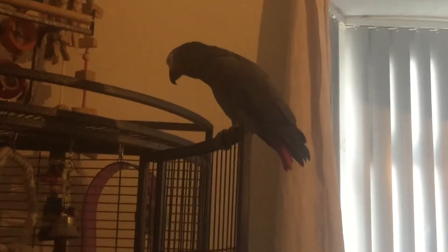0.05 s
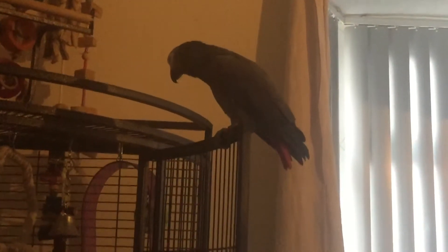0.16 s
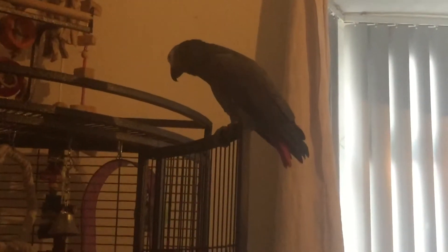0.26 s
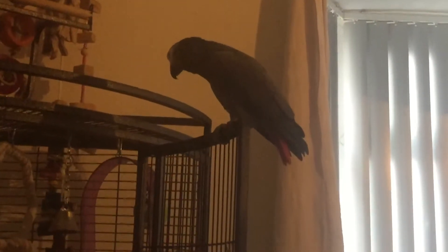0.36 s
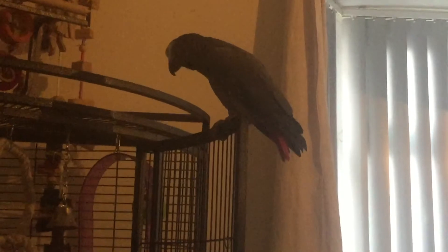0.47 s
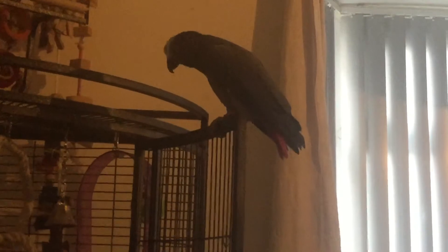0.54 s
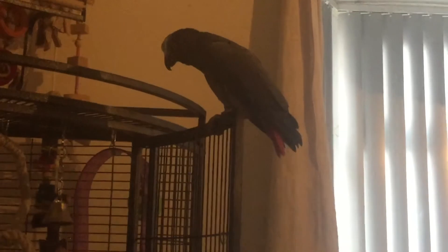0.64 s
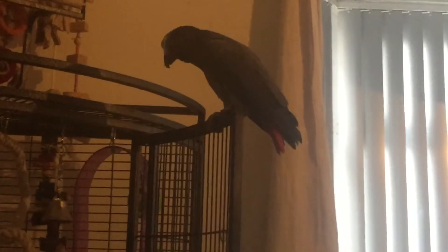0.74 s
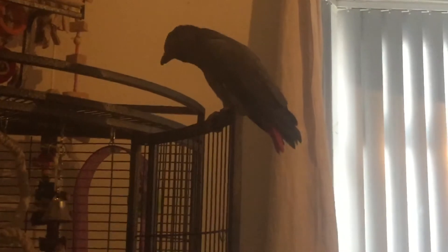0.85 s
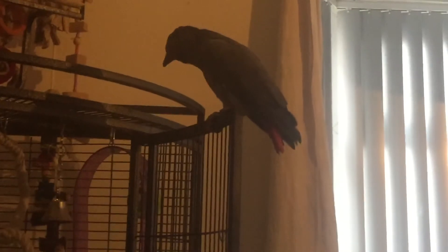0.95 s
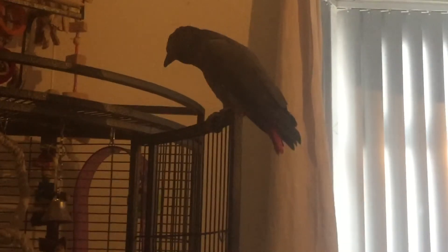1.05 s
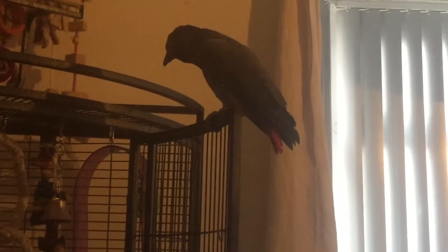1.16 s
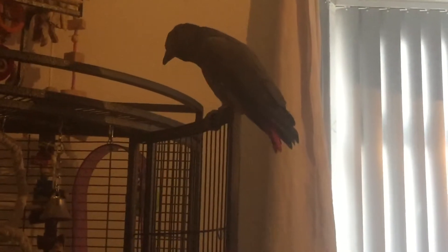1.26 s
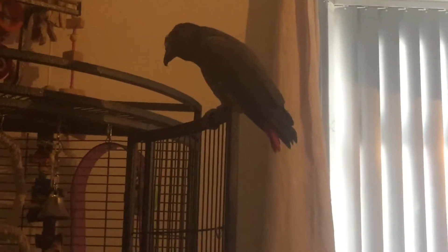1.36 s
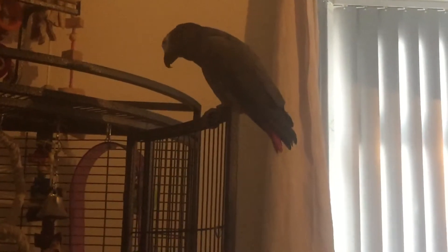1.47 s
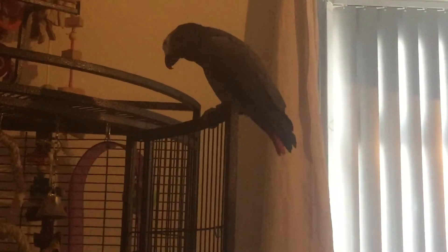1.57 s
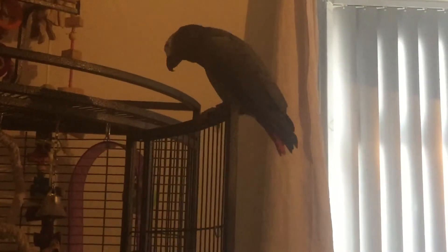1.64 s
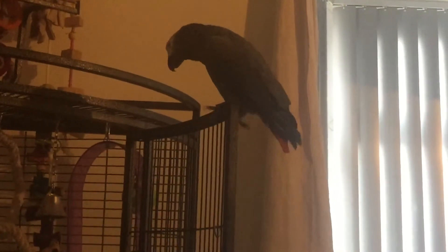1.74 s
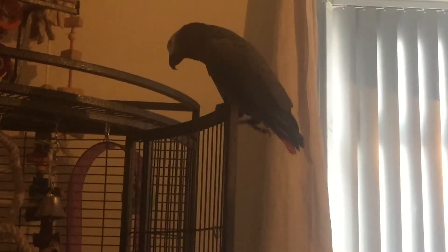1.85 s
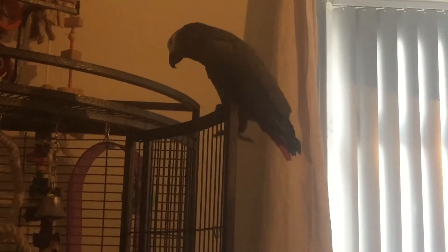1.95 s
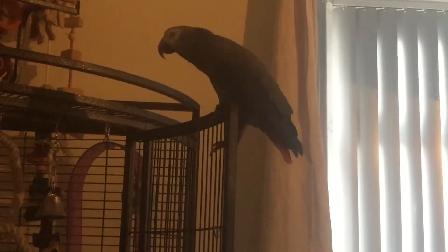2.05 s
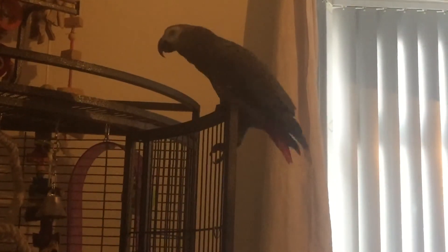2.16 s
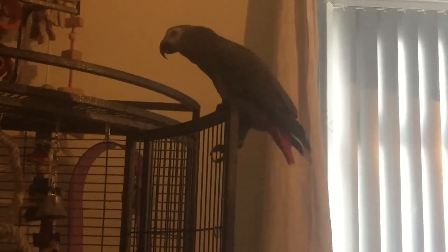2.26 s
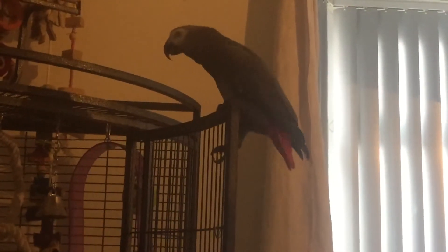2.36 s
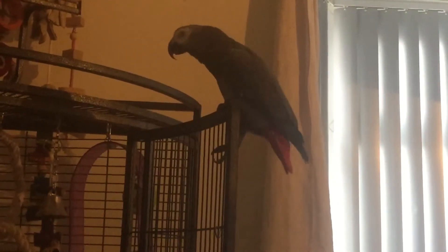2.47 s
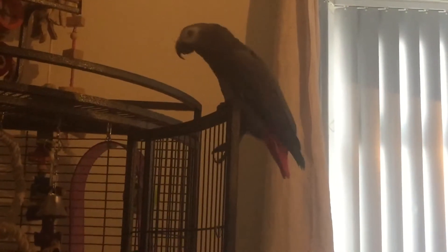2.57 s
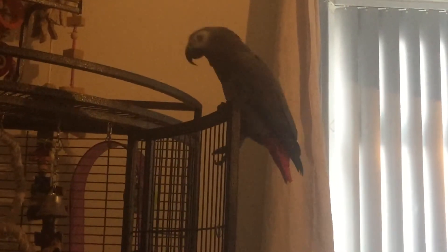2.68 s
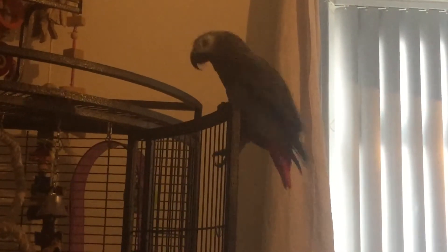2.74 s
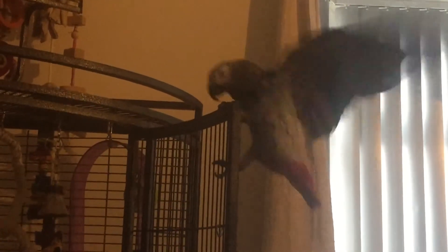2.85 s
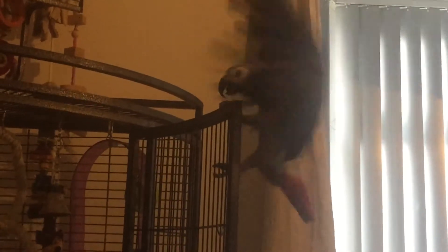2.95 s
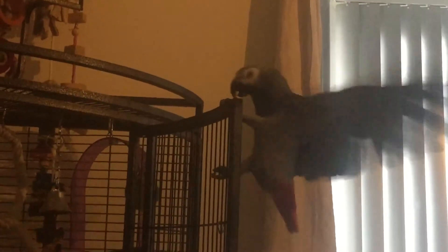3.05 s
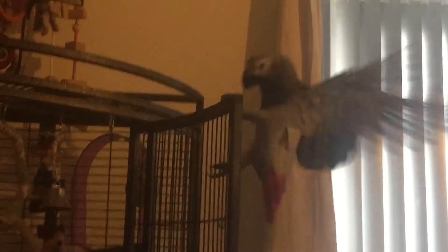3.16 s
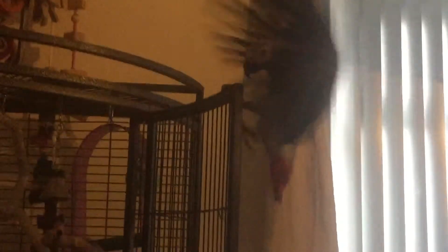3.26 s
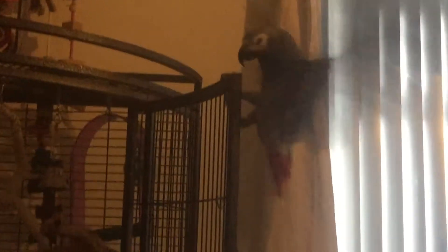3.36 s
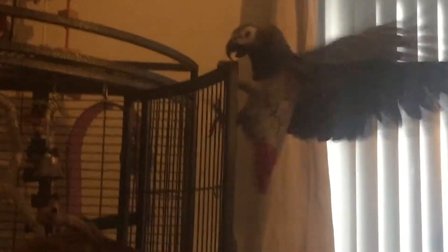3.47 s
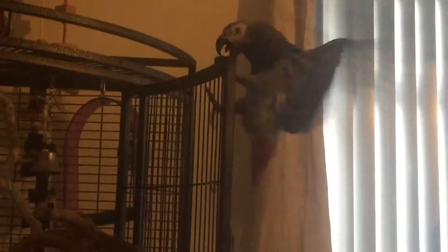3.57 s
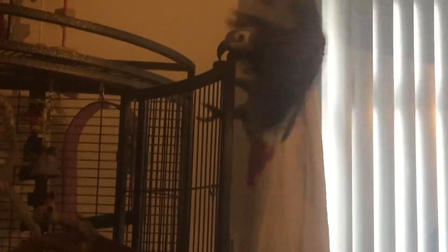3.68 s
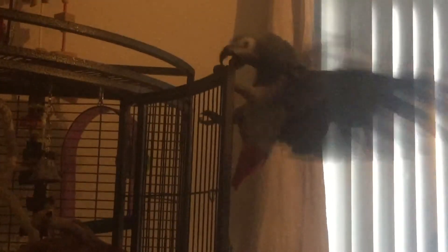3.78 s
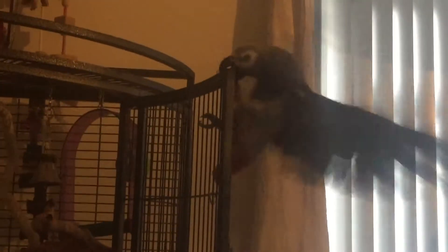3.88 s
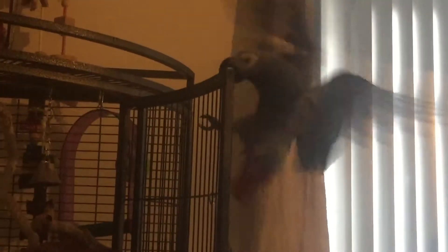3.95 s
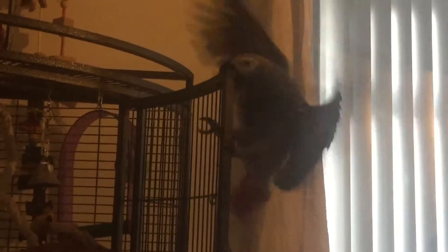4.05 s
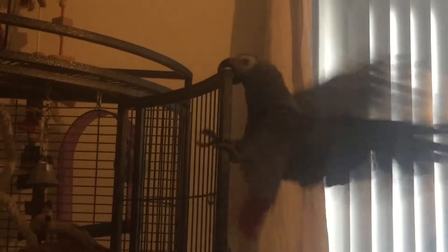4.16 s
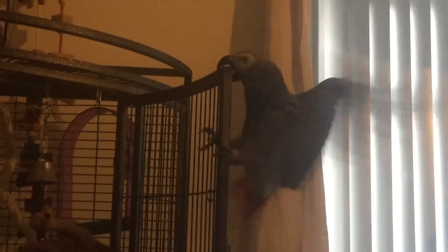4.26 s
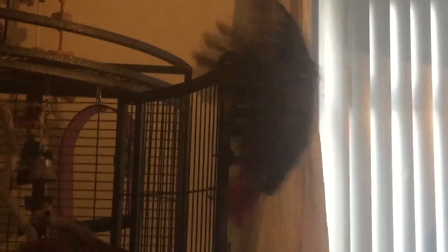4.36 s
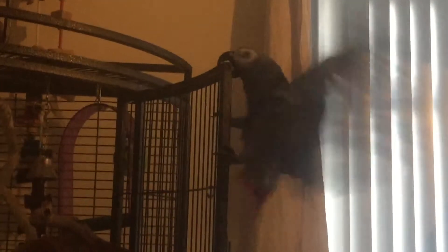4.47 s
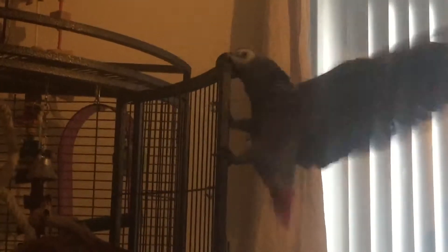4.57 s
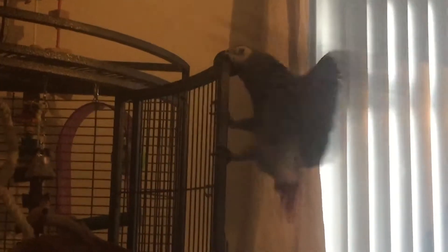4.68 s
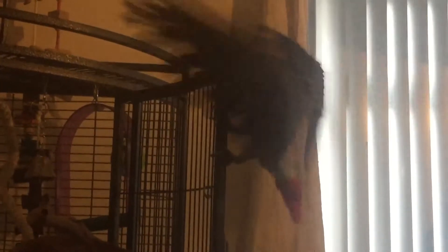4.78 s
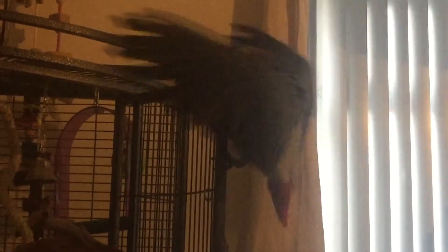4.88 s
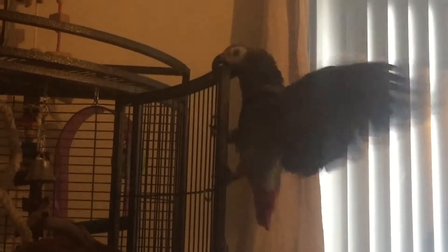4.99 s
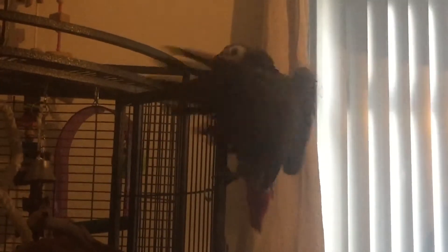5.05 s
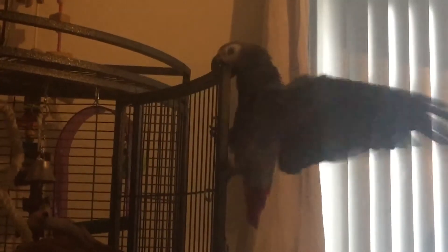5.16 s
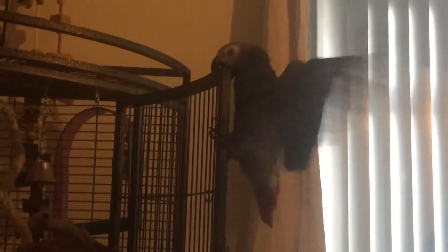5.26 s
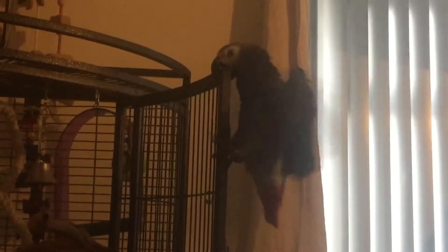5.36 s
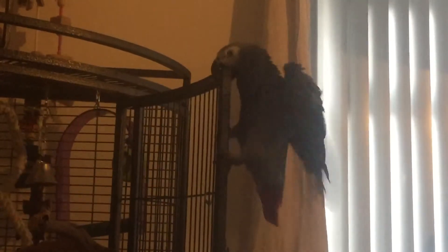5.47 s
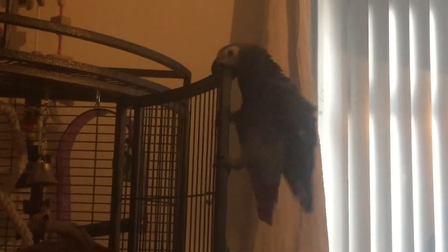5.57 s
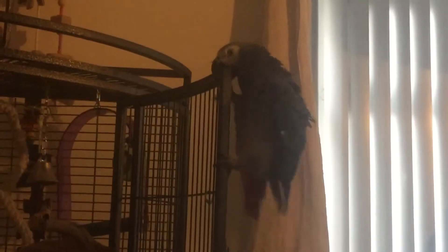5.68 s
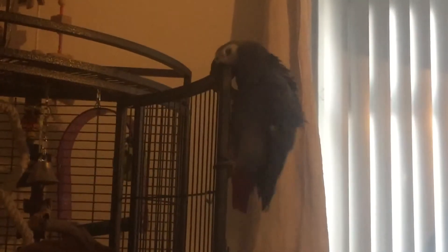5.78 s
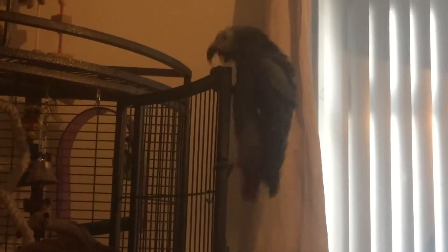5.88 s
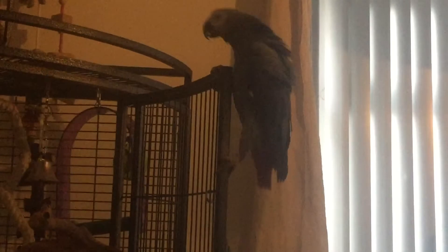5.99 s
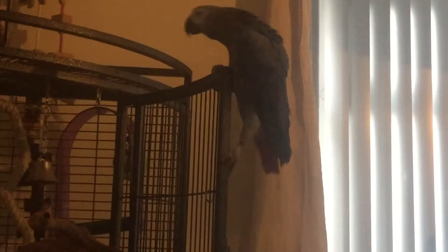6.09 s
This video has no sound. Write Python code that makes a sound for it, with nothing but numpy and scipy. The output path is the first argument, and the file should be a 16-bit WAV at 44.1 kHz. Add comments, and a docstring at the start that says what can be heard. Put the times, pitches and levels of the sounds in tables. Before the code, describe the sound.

Low electrical hum in a small room, then a parrot's wings flap in fast, feathery whooshing beats while claws scrape and ring metal cage bars.

```python
"""An appliance hums in a small room, with dull noise and faint swells of hiss, before claws scrape a metal cage.
A grey parrot clambers down the cage door, slips, and beats its wings about seven times a second to climb back.
Each beat layers shaped noise: a push of air, a gusty whoosh and a rustle of feathers, with slaps and brushes.
Claws and beak scrape the bars: bursts of grains set noisy modes ringing, and sine tones sing on after a slip.
"""
import sys
import numpy as np
from scipy import signal
from scipy.fft import rfft, irfft
from scipy.io import wavfile

SR = 44100
rng = np.random.default_rng(int(sys.argv[2]) if len(sys.argv) > 2 else 0)


def put_to_file(sound):
    """Save the sound as 16-bit audio at rate SR, in the file named by the first command-line argument."""
    columns = np.atleast_2d(sound).T  # one column per channel
    safe = np.clip(columns, -1, 1)
    whole_steps = np.round(safe * 32767)
    wavfile.write(sys.argv[1], SR, whole_steps.astype(np.int16))


N = 270059

EVENT_SIZE = 32768  # samples in one sound event
LEAD_S = 0.15  # room before an event's nominal time, for sounds that swell up to it
AGE = np.arange(EVENT_SIZE) / SR  # seconds since the event began

# Spectrum of rubbing feathers. Each row: frequency in Hz, relative level in dB per Hz.
FEATHER_COLOUR = [(500, 8), (1100, 0.5), (1900, 6), (3200, 6), (5000, 0), (8000, 1.5), (11000, 0),
                  (15500, -4.5)]


def from_db(db):
    """Decibels to gain."""
    return 10 ** (np.asarray(db) / 20)


def rms_one(x):
    """Scale to unit rms."""
    return x / np.sqrt(np.mean(x ** 2) + 1e-20)


def unit_attack(x):
    """Scale a hit to unit rms over its first thirtieth of a second."""
    return x / np.sqrt(np.mean(x[:SR // 30] ** 2) + 1e-20)


def add(out, s, sound):
    """Mix a sound in at time s, in seconds."""
    start = int(s * SR)
    out[start:start + len(sound)] += sound[:N - start]


def noise():
    """White noise as long as one event."""
    return rng.standard_normal(EVENT_SIZE)


def grains(spread_db):
    """Dense tiny snaps of very uneven size."""
    return noise() * from_db(spread_db * np.minimum(rng.exponential(1, EVENT_SIZE), 5))


def drift(rate, size):
    """Smooth chance that changes about `rate` times a second; rms 1."""
    knots = rng.standard_normal(size // 20)
    return rms_one(np.interp(np.arange(size) * rate / SR, np.arange(len(knots)), knots))


def swell(peak_s, rise_s, fall_s):
    """Exponential rise to a peak and fall from it, timed from the end of the lead."""
    t = AGE - LEAD_S - peak_s
    return np.exp(np.minimum(t, 0) / rise_s - np.maximum(t, 0) / fall_s)


def octaves(size):
    """Log2 frequency of each bin of a spectrum."""
    return np.log2(np.maximum(np.arange(size // 2 + 1) * SR / size, 1))


def coloured(x, colour, tilt_db=0):
    """Give x a spectrum, tilted in dB per octave about its middle point; rms 1."""
    hz, db = np.transpose(colour)
    pitch = octaves(len(x))
    tilt = tilt_db * np.clip(pitch - np.log2(hz[len(hz) // 2]), -2, 2)
    shape = np.interp(pitch, np.log2(hz), db) + tilt
    below = np.minimum(pitch - np.log2(hz[0]), 0)  # octaves under the lowest point: 20 dB lost in each
    return rms_one(irfft(rfft(x) * from_db(shape + 20 * below), len(x)))


def reach(hz, centre_hz, width):
    """Resonance-like weight around a centre; for a contact, its hardness decides which modes it reaches."""
    return 1 / (1 + (np.log2(hz / centre_hz) / width) ** 2)


def fluttering(x, depth_db, rate, count=7):
    """Irregular gusts: bands an octave apart waver, partly together and partly alone; the top stays steady."""
    spectrum, pitch, shared = rfft(x), octaves(len(x)), drift(rate, len(x))
    centres = np.log2(200) + np.arange(count)
    bands = [irfft(spectrum * np.interp(pitch, centres, band), len(x)) for band in np.eye(count)]
    out = bands[-1]
    for band in bands[:-1]:
        waver = (shared + drift(rate, len(x))) / np.sqrt(2)
        out = out + band * from_db(depth_db * waver)
    return out


def room_noise(uneven_db=2.2, changes_per_s=11):
    """Dull, slightly uneven noise, with faint, short swells of hiss."""
    # Spectra of the steady noise and the hiss. Each row: frequency in Hz, relative level in dB per Hz.
    noise_colour = [(22, -27), (41, 7), (55, -1.5), (130, 5.5), (220, -0.5), (290, -3.5), (370, -11),
                    (580, -5), (1100, -10.5), (1570, -15), (1680, -10.5), (1860, -13.5), (2000, -19.5),
                    (4500, -28.5), (8000, -31), (15500, -41)]
    hiss_colour = [(800, -22), (1250, 5), (1750, -4.5), (2300, -18), (6000, -37)]
    # Swells of hiss. Each row: peak time in seconds, level in dB.
    hiss_swells = [(0.291, -53), (0.799, -70), (0.929, -72), (1.071, -61), (1.361, -65)]
    level_db = -54
    steady = coloured(rng.standard_normal(N), noise_colour)
    out = from_db(level_db) * fluttering(steady, uneven_db, changes_per_s, count=5)
    for s, db in hiss_swells:
        hiss = coloured(noise(), hiss_colour) * swell(0, 0.025, 0.033)
        add(out, s - LEAD_S, from_db(db) * hiss)
    return out


def appliance(wander=0.19):
    """A strong, wavering mains hum with a few faint motor tones whose phase wanders by `wander` radians."""
    # Course of the hum before its waver. Each row: time in seconds, rms level in dB.
    hum = [(0.05, -32), (0.47, -34.5), (1.03, -32), (1.29, -34.5), (2.12, -32.5), (2.56, -35),
           (2.71, -32.5), (2.99, -34.5), (3.41, -32), (3.69, -33.5), (3.73, -35.5), (4.23, -31),
           (4.73, -33), (5.41, -32), (5.88, -34.5), (6.05, -33)]
    # Steady motor tones. Each row: frequency in Hz, rms level in dB.
    motor_tones = [(199.6, -62.5), (699, -73), (834.4, -61.5), (1206.5, -74), (1498, -70)]
    hum_hz, waver_db, wavers_per_s = 99.9, 0.49, 13
    t = np.arange(N) / SR
    level_db = np.interp(t, *np.transpose(hum)) + waver_db * drift(wavers_per_s, N)
    out = from_db(level_db) * np.sin(2 * np.pi * hum_hz * t)
    for hz, db in motor_tones:
        out = out + from_db(db) * np.sin(2 * np.pi * hz * t + wander * drift(8.7, N))
    return np.sqrt(2) * out  # sine peak from rms level


def beak():
    """The beak snaps with a short, hollow tick: resonantly coloured noise that dies at once."""
    # Clicks. Each row: start in seconds, level in dB.
    clicks = [(1.562, -51.5), (2.736, -69.5)]
    # Spectrum of the tick. Each row: frequency in Hz, relative level in dB per Hz.
    beak_colour = [(900, -22), (1650, 0.5), (2100, -19), (2550, -5), (2880, -17), (3330, 0), (3800, -23),
                   (5200, -21), (5700, -2), (6100, 10), (6550, -9), (7300, -7), (8500, -20), (15500, -33)]
    decay_s = 0.011
    out = np.zeros(N)
    for s, db in clicks:
        tick = coloured(noise(), beak_colour) * np.exp(-AGE / decay_s)
        add(out, s, from_db(db) * unit_attack(tick))
    return out


def cage_ring(slips, damping, frame_db, frame_t60_s=0.32):
    """The cage answers a run of slips: noisy bending modes of the bars over a short clatter of the frame."""
    # Bending modes. Each row: frequency in Hz, relative level in dB, t60 in seconds before the grip damps it.
    bar_modes = [(1930, 4, 0.7), (3220, -2, 0.36), (4630, -7, 0.33), (6540, -2, 0.32), (8810, -4.5, 0.56),
                 (11300, -4, 0.21), (14000, -6, 0.13)]
    bar_spread = 0.042  # the many bars differ a little: each mode is a cluster this wide, as a share of its pitch
    frame = noise()
    spectrum, force, bins_hz = rfft(frame), rfft(slips), 2 ** octaves(EVENT_SIZE)
    parts = [(frame, frame_db, frame_t60_s)]
    for hz, db, t60 in bar_modes:
        cluster = 1 / (1 + abs((bins_hz / hz - 1) / bar_spread) ** 3)
        parts.append((irfft(spectrum * cluster), db, t60))
    out = np.zeros(EVENT_SIZE)
    for part, db, t60 in parts:
        response = part * from_db(-(60 / t60 + damping) * AGE)
        out += from_db(db) * unit_attack(irfft(force * rfft(response)))
    return out


def contact(length, bright_hz, width, damping, frame_db, judder_db=7):
    """A claw lands on a bar, judders along it and sets the cage clattering until the grip damps it."""
    strike_s = 0.00046  # the first touch carries as much energy as this much scraping
    slips = grains(spread_db=5.0) * from_db(judder_db * drift(415, EVENT_SIZE)) * np.exp(-AGE / length)
    slips[0] += np.sqrt(strike_s / length * np.sum(slips ** 2))
    spectrum = rfft(cage_ring(slips, damping, frame_db))
    ringing = irfft(spectrum * reach(2 ** octaves(EVENT_SIZE), bright_hz, width))
    return unit_attack(ringing[:EVENT_SIZE // 2])


def clear_ring(length, bright_hz, width):
    """A few free bars build up while the claw scrapes and sing on after it."""
    # Single bars that ring clearly. Each row: frequency in Hz, relative level in dB, t60 in seconds
    # before the damping of the pluck.
    clear_modes = [(1925, -4, .5), (1969, 3, .9), (3215, -5, .5), (4696, -4, .5), (4818, 0, .8),
                   (6578, -8, .35), (6782, -4, .4), (8650, -5, .25), (8903, -5, .27)]
    tones = np.zeros(EVENT_SIZE)
    for hz, db, t60 in clear_modes:
        level = reach(hz, bright_hz, width) * from_db(db - 60 * AGE / t60)
        tones += level * np.sin(2 * np.pi * (hz * AGE + rng.random()))  # random starting phase
    return unit_attack(tones) * (1 - np.exp(-AGE / length))


def bars():
    """Scrapes clatter, plucked bars sing on, held bars only squeak; returns the clatter and the clear tones."""
    # Claws and beak scrape the bars. Each row: start in seconds, level in dB, scrape decay time in seconds,
    # brightest frequency in Hz, relative clatter of the frame in dB.
    scrapes = [ (2.094, -53.5, 0.018, 8300, 5), (2.133, -57, 0.02, 2550, 26),
               (2.237, -57.5, 0.0051, 8700, 1), (2.423, -73.5, 0.02, 8950, 4),
               (2.878, -65.5, 0.044, 4000, 25), (3.334, -63, 0.031, 8000, 6),
               (3.626, -43.5, 0.025, 12600, 1), (4.221, -50.5, 0.031, 7900, 8),
               (4.279, -42, 0.0049, 6750, 11), (4.432, -36.5, 0.023, 9600, 1),
               (4.63, -41.5, 0.011, 5640, 11), (4.766, -51.5, .02, 12000, 12),
               (5.095, -48.5, 0.025, 7600, 13), (5.248, -55, 0.0041, 7040, 0),
               (5.28, -56.5, 0.027, 13000, 9), (5.394, -47.5, 0.0058, 9500, 5),
               (5.524, -46, 0.0086, 13800, 1)]
    # A claw slips off and leaves a bar ringing freely. Each row: start in seconds, level in dB before the
    # clatter's trim, brightest frequency in Hz.
    plucks = [(2.139, -61.5, 3180), (2.146, -72, 4700), (2.247, -68, 3200), (2.25, -70, 8800),
              (3.335, -61, 4800), (3.629, -47.5, 9100), (3.648, -55.5, 4750), (4.283, -58, 4800),
              (4.348, -52, 8650), (4.438, -47, 5470), (4.44, -55, 1950), (4.632, -57, 4860),
              (5.41, -66, 3200), (5.53, -60, 3180)]
    # A claw skids on a firmly held bar with a dry squeak. Each row: start in seconds, level in dB,
    # pitch in Hz, width in octaves.
    squeaks = [(3.415, -45, 9350, 0.022), (3.417, -41.5, 13000, 1), (4.348, -48, 12000, .8),
               (4.628, -48, 11700, .12), (5.697, -51.5, 13000, 0.48), (5.70, -59.5, 9850, .05),
               (5.974, -65.5, 5070, 0.41), (6.016, -63.5, 5500, 0.75)]
    scrape_width_octaves, grip_db_per_s = 0.91, 81  # reach of a contact; damping by the foot
    pluck_s, pluck_width_octaves, free_db_per_s = 0.0067, 0.088, 40
    pluck_clatter_db, pluck_frame_db = -1.5, -12
    squeak_s, held_db_per_s, held_frame_db = 0.016, 596, 38  # a held bar hardly rings
    clatter, tones = np.zeros(N), np.zeros(N)
    for s, db, length, bright_hz, frame_db in scrapes:
        scrape = contact(length, bright_hz, scrape_width_octaves, grip_db_per_s, frame_db)
        add(clatter, s, from_db(db) * scrape)
    for s, db, bright_hz in plucks:
        slip = contact(pluck_s, bright_hz, pluck_width_octaves, free_db_per_s, pluck_frame_db)
        add(clatter, s, from_db(db + pluck_clatter_db) * slip)
        singing = clear_ring(pluck_s, bright_hz, pluck_width_octaves)
        add(tones, s, from_db(db - free_db_per_s * AGE) * singing)
    for s, db, pitch_hz, width in squeaks:
        squeak = contact(squeak_s, pitch_hz, width, held_db_per_s, held_frame_db)
        add(clatter, s, from_db(db) * squeak)
    return clatter, tones


def wing_touches():
    """Spread wings slap with hollow, band-limited thuds, quills crack and wing tips brush a curtain."""
    # Slaps of a spread wing. Each row: start in seconds, level in dB, pitch in Hz.
    slaps = [(3.328, -47, 182), (3.352, -49.5, 666), (3.382, -54, 348), (3.49, -49, 505), (3.609, -49, 990),
             (3.628, -44.5, 535), (3.738, -49, 204), (3.857, -43.5, 586), (3.892, -47.5, 945),
             (3.985, -46, 603), (4.551, -42, 185), (4.695, -51.5, 1400), (4.835, -49, 192),
             (4.842, -44, 545), (4.848, -53, 1130), (4.930, -47.5, 576), (4.969, -44, 199)]
    # A stiff quill flicks past another. Each row: start in seconds, level in dB.
    quill_cracks = [(3.611, -62), (3.891, -48), (4.028, -52.5), (4.124, -49.5), (5.138, -56)]
    # The wing tips brush along the curtain. Each row: peak time in seconds, level in dB.
    brushes = [(3.553, -41.5), (3.586, -50), (3.792, -52.5), (3.962, -52), (4.127, -42)]
    # Spectrum of cracks and brushes. Each row: frequency in Hz, relative level in dB per Hz.
    brush_colour = [(400, -3), (1400, 6.5), (3300, 1), (5000, -6), (15500, -8)]
    slap_rise_s, slap_fall_s, slap_width_octaves = 0.0013, 0.009, 0.2
    crack_fall_s, brush_rise_s, brush_fall_s = 0.0063, 0.014, 0.062
    out = np.zeros(N)
    for s, db, pitch_hz in slaps:
        thud = irfft(rfft(noise()) * reach(2 ** octaves(EVENT_SIZE), pitch_hz, slap_width_octaves))
        envelope = np.exp(-AGE / slap_fall_s) * (1 - np.exp(-AGE / slap_rise_s))
        add(out, s, from_db(db) * unit_attack(thud * envelope))
    for s, db in quill_cracks:
        crack = coloured(noise(), brush_colour) * np.exp(-AGE / crack_fall_s)
        add(out, s, from_db(db) * unit_attack(crack))
    for s, db in brushes:
        brush = coloured(fluttering(grains(spread_db=2.0), depth_db=2.0, rate=111), brush_colour)
        add(out, s - LEAD_S, from_db(db) * brush * swell(0, brush_rise_s, brush_fall_s))
    return out


def folding(clump_db=3.5, clumps_per_s=90, edge_s=0.021):
    """As the wings fold, feathers slide into place in small, crackling clumps."""
    start_s, end_s, level_db = 5.27, 5.70, -65.5
    out = np.zeros(N)
    crackle = coloured(fluttering(grains(spread_db=5.5), clump_db, clumps_per_s), FEATHER_COLOUR)
    hold = (1 - np.exp(-AGE / edge_s)) * np.exp(-np.maximum(AGE - (end_s - start_s), 0) / edge_s)
    add(out, start_s, from_db(level_db) * crackle * hold)
    return out


def rustle(tilt_db, flick_db=2.0, slide_db=-8.5, upstroke_db=-15):
    """Flight feathers snap past each other on the downstroke, slide on, and brush again on the way up."""
    stroke = swell(0.0037, 0.0093, 0.032)
    slide = from_db(slide_db) * swell(0.012, 0.019, 0.096)
    upstroke = from_db(upstroke_db) * swell(0.085, 0.026, 0.03)
    flicks = from_db(flick_db * drift(272.0, EVENT_SIZE))
    feathers = coloured(grains(spread_db=2.5) * flicks, FEATHER_COLOUR, tilt_db)
    return feathers * np.sqrt(stroke ** 2 + slide ** 2 + upstroke ** 2)


def whoosh(eddy_db=1.5, glide_octaves=0.3, gust_db=3.5, gusts_per_s=70):
    """Eddies shed from the wing's edge swell and fade in uneven gusts, sinking in pitch as the wing slows."""
    # Spectrum of the eddies before the glide. Each row: frequency in Hz, relative level in dB per Hz.
    whoosh_colour = [(200, 0), (400, -2), (600, 8.5), (790, -5.5), (1050, 1.5), (2000, -7), (5000, -53)]
    eddies = noise() * from_db(eddy_db * drift(135.0, EVENT_SIZE))
    speed = 2 ** (-glide_octaves * np.tanh((AGE - LEAD_S) / 0.05))
    # reading the noise at a falling speed lowers its pitch
    gliding = np.interp(np.cumsum(speed), np.arange(EVENT_SIZE), coloured(eddies, whoosh_colour))
    return rms_one(fluttering(gliding, gust_db, gusts_per_s)) * swell(0, 0.053, 0.056)


def wings():
    """Each beat rustles, whooshes and pushes air; a stronger whoosh dulls the rustle and raises the wake."""
    # Wingbeats. Each row: time in seconds, feather rustle in dB, whoosh of air in dB, slow puff of air in dB.
    wingbeats = [ (3.001, -44, -62, -74), (3.168, -45.5, -51.5, -46), (3.313, -43.5, -46, -41),
                 (3.452, -40.5, -45, -42), (3.586, -40, -44.5, -53), (3.725, -42, -45.5, -46.5),
                 (3.864, -41.5, -46, -66), (3.999, -42, -47, -44), (4.120, -69, -46, -51),
                 (4.284, -48, -49, -46.5), (4.432, -40.5, -56.5, -50.5), (4.565, -45, -47.5, -43.5),
                 (4.702, -42.5, -46.5, -50), (4.826, -40.5, -39.5, -43), (4.958, -43, -45.5, -47),
                 (5.109, -50, -63, -66), (5.284, -50, -81, -59), (5.401, -49.5, -88, -50.5)]
    # Spectra of the slow puff and the wake. Each row: frequency in Hz, relative level in dB per Hz.
    push_colour = [(20, -32), (31, 1), (40, -1), (55, -5), (130, -9), (280, -13), (700, -35)]
    wake_colour = [(70, -10), (125, 6.5), (200, 3), (280, 0), (420, -2.5), (900, -28)]
    usual_whoosh_db = -47  # a full stroke
    rustle_tilt_db, rustle_dulling = 1, 0.069  # dB per octave at a full stroke; its loss per dB of whoosh
    wake_db, wake_follows = -48.5, 1.08  # at a full stroke; dB per dB of whoosh
    whoosh_delay_s = 0.017  # the air peaks just after the feathers snap
    out = np.zeros(N)
    for s, rustle_db, whoosh_db, push_db in wingbeats:
        effort_db = whoosh_db - usual_whoosh_db
        feathers = from_db(rustle_db) * rustle(rustle_tilt_db - rustle_dulling * effort_db)
        push = coloured(noise(), push_colour) * swell(0.04, 0.025, 0.11)
        wake = coloured(noise(), wake_colour) * swell(0.012, 0.012, 0.026)
        air = from_db(whoosh_db) * whoosh() + from_db(wake_db + wake_follows * effort_db) * wake
        add(out, s - LEAD_S, feathers + from_db(push_db) * push)
        add(out, s + whoosh_delay_s - LEAD_S, air)
    return out


def room(x, wet_db=-7.0, wall_hz=11000):
    """Direct sound plus a short noise tail from nearby walls, which soak up some treble."""
    t60_s = 0.22
    tail = noise() * from_db(-60 * AGE / t60_s) * (AGE > 0.004)
    tail = tail / np.sqrt(np.sum(tail ** 2))
    dull = np.exp(-2 * np.pi * wall_hz / SR)
    tail = signal.lfilter([1 - dull], [1, -dull], tail)
    return x + from_db(wet_db) * signal.fftconvolve(x, tail)[:N]


def scene():
    """The bird and its cage in the humming room; clear bar tones, hum and room noise bypass the reverb."""
    steady = room_noise() + appliance()
    clatter, tones = bars()
    bird = wings() + wing_touches() + folding() + clatter + beak()
    return (room(bird) + tones + steady)[None]


def record(dry):
    """A small microphone loses deep bass and two narrow treble bands; the ends fade, the top is cut steeply."""
    # Dips in the microphone's response. Each row: frequency in Hz, depth in dB, width in octaves.
    mic_dips = [(7730, -5, 0.094), (10500, -5, 0.036)]
    low_hz, cutoff_hz, fade_s = 31.3, 15720, 0.003
    dips_db = sum(db * reach(2 ** octaves(N), hz, width) for hz, db, width in mic_dips)
    dipped = irfft(rfft(dry) * from_db(dips_db), N)
    heard = signal.sosfilt(signal.butter(4, low_hz, "high", fs=SR, output="sos"), dipped)
    to_nearest_end = np.minimum(np.arange(N), np.arange(N)[::-1])
    fade = np.minimum(to_nearest_end / (fade_s * SR), 1)
    return signal.sosfilt(signal.ellip(12, 0.1, 90, cutoff_hz, fs=SR, output="sos"), heard * fade)


dry = scene()
out = record(dry)
put_to_file(out)
```